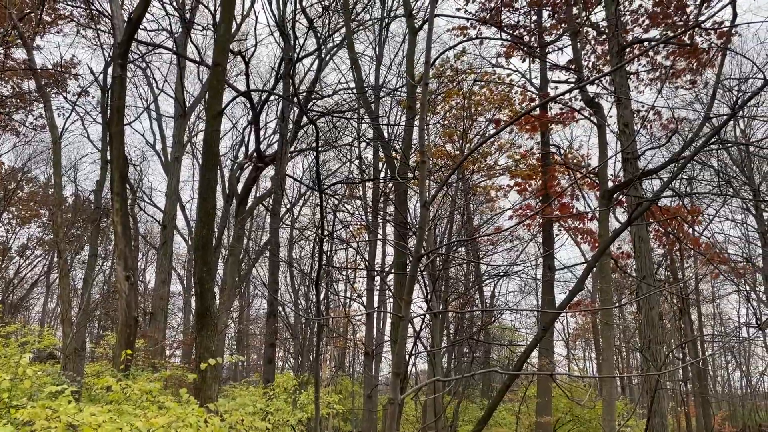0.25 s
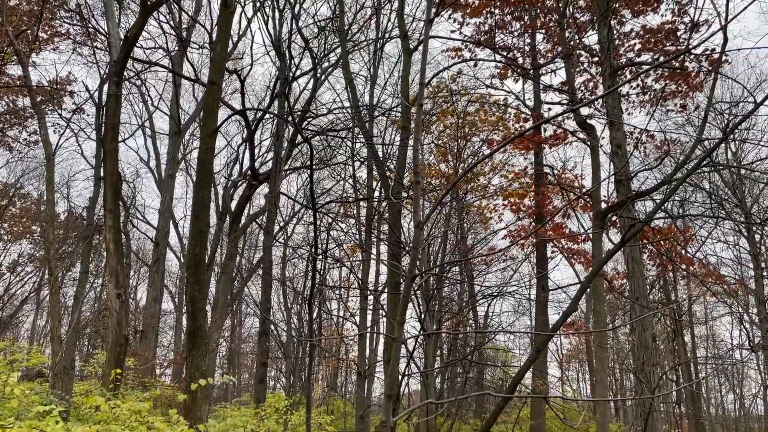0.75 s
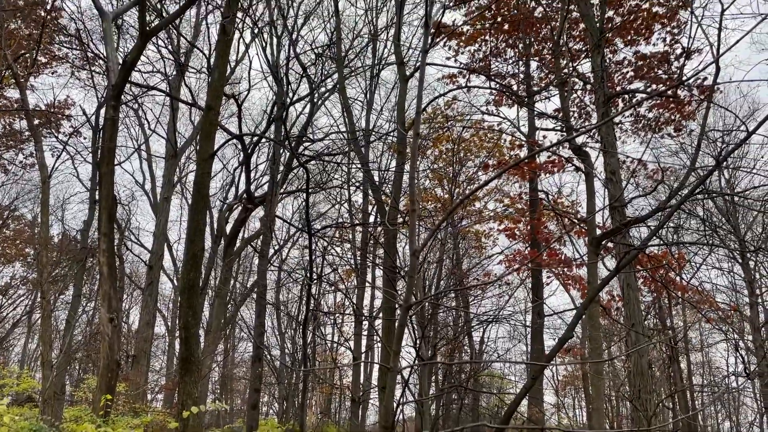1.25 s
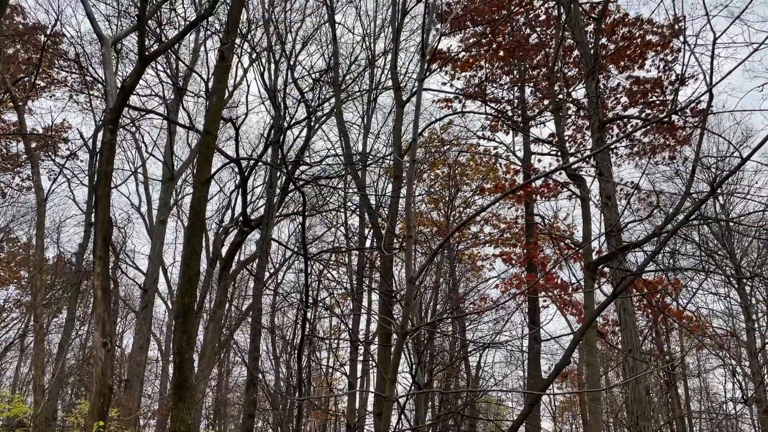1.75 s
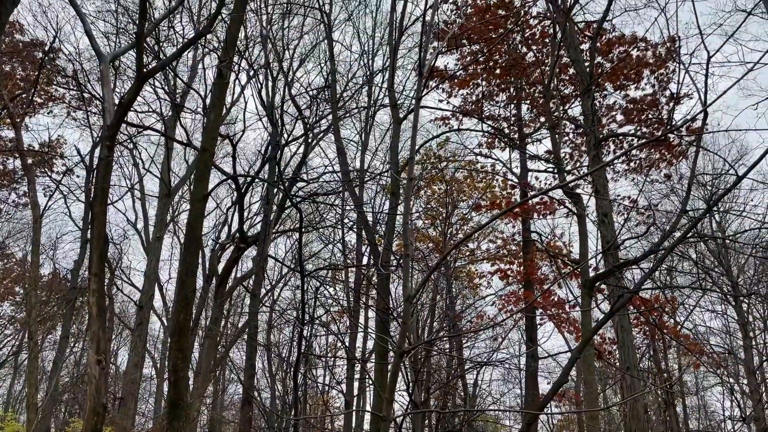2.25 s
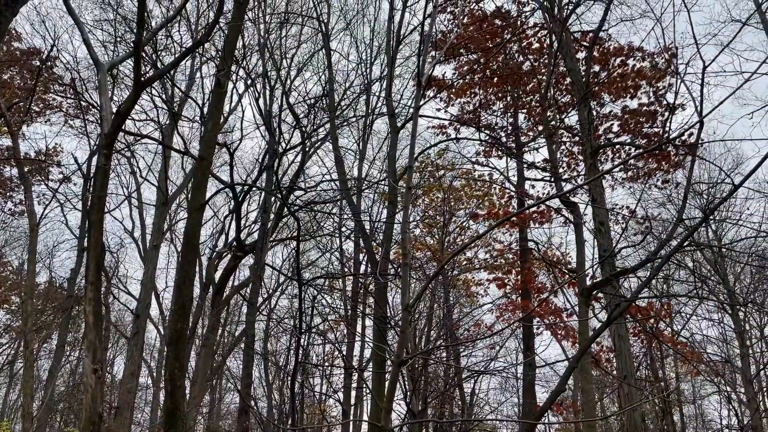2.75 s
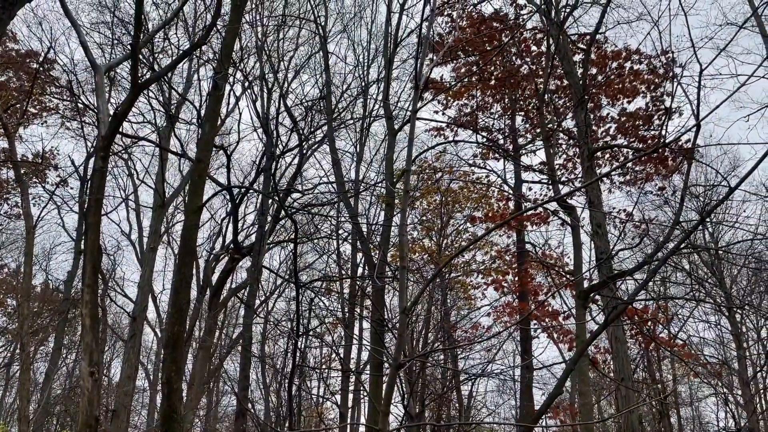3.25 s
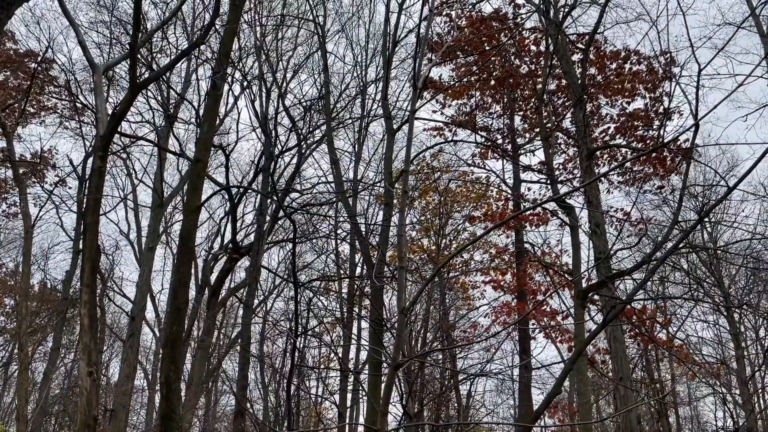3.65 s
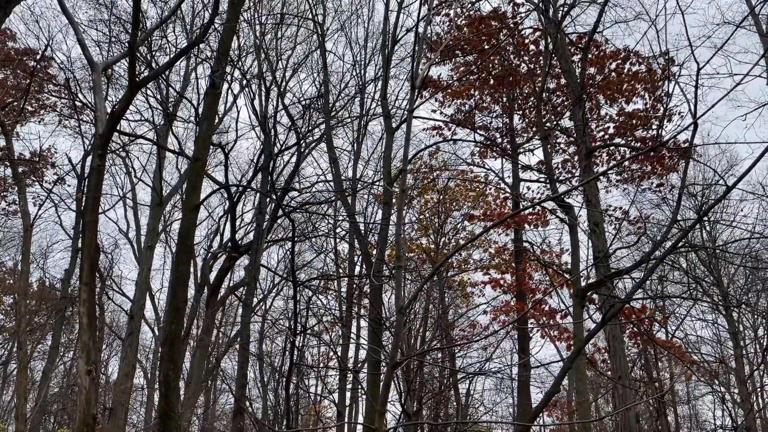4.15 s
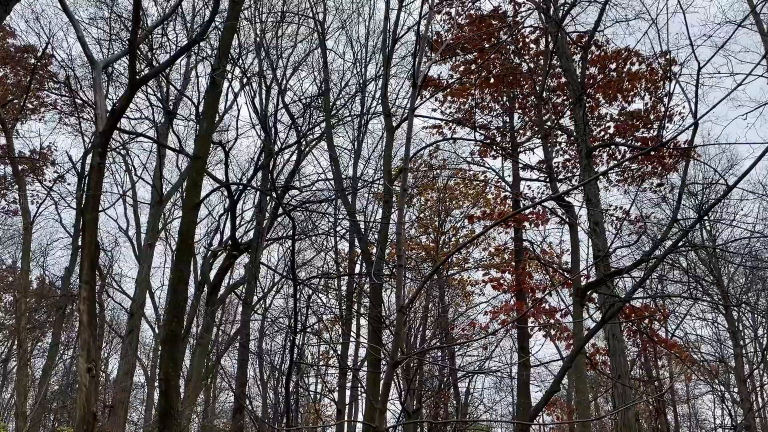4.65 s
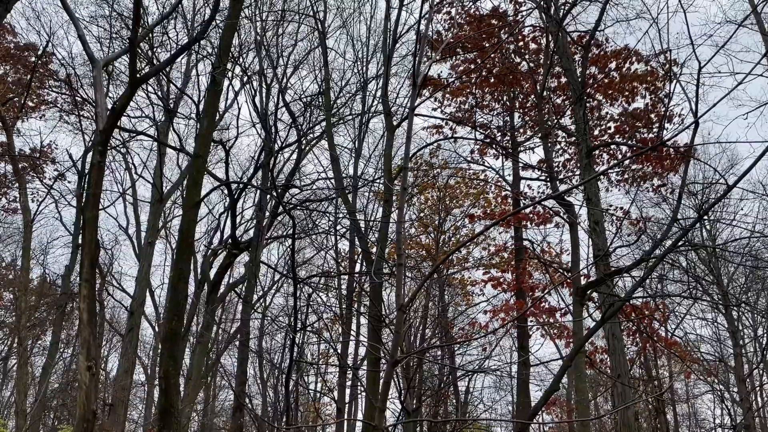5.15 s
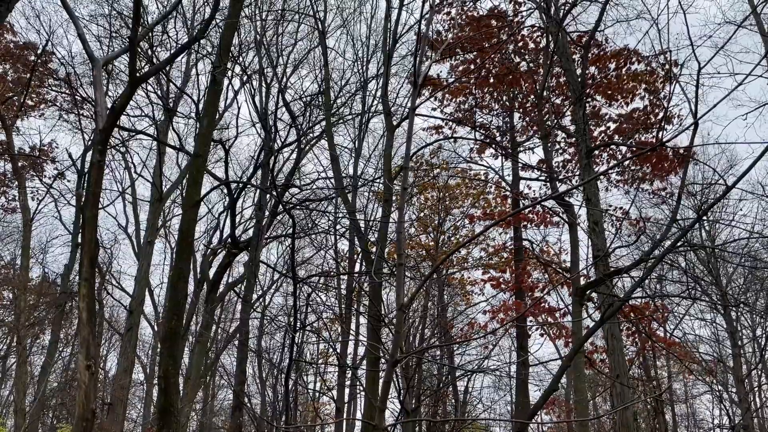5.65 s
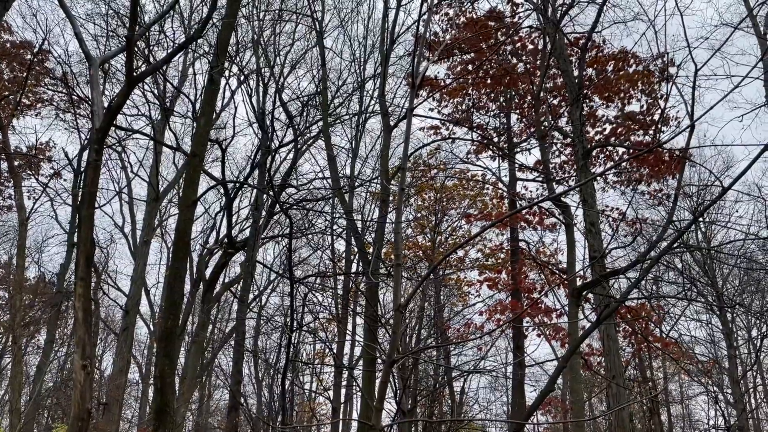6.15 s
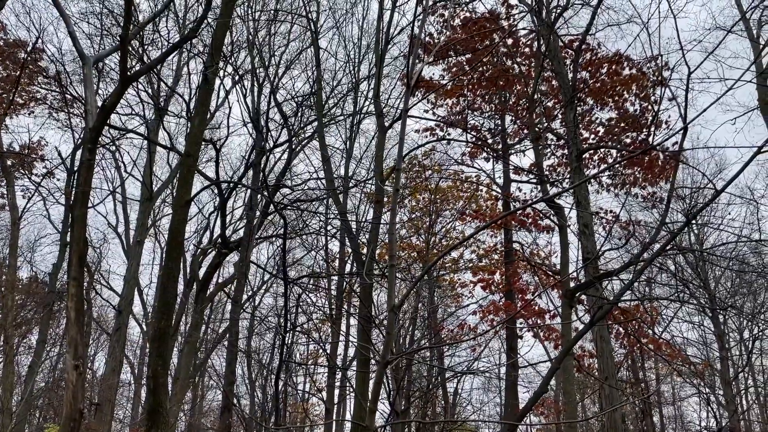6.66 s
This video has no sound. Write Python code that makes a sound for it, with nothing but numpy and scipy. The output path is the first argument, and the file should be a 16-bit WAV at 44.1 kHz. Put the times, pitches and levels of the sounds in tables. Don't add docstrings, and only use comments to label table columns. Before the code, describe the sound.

Outdoors in a bare wood, a flock of small birds calls without pause. Short clear whistles, low warbles and quick upward slurs come from nearby perches, over a dense blurred chorus farther off. Trunks give each note a brief soft tail. A low distant rumble and faint hiss stay beneath, with dull wind bumps on the stereo microphone, strongest late in the stretch.

```python
import sys
import numpy as np
from scipy import signal
from scipy.fft import rfft, irfft
from scipy.io import wavfile
from scipy.ndimage import uniform_filter1d

SR = 44100
rng = np.random.default_rng(int(sys.argv[2]) if len(sys.argv) > 2 else 0)


def output_pcm(signal):
    pcm = np.clip(np.atleast_2d(signal).T, -1, 1) * 32767
    wavfile.write(sys.argv[1], SR, np.round(pcm).astype(np.int16))


def voltage_ratio(level):
    return 10 ** (np.asarray(level, float) / 20)


N = 304290
HZ = np.fft.rfftfreq(N, 1 / SR) + 1e-3


def rms_one(x):
    return x / np.sqrt(np.mean(x ** 2) + 1e-20)


def in_time(rows):
    s, *columns = np.transpose(rows)
    return np.array([voltage_ratio(np.interp(np.arange(N) / SR, s, column)) for column in columns])


def at_hz(points):
    hz, value = np.transpose(points)
    return np.interp(np.log(HZ), np.log(hz), value)


def drift(rate):
    pole = np.exp(-80 * np.pi * rate / SR)
    noise = rng.standard_normal(N // 40 + 2002)
    slow = signal.lfilter([1], [1, -2 * pole, pole * pole], noise)[2000:]
    return np.interp(np.arange(N) / 40, np.arange(len(slow)), rms_one(slow))


def coloured(spectrum):
    return rms_one(irfft(rfft(rng.standard_normal(N)) * voltage_ratio(at_hz(spectrum)), N))


def band_noise(low_hz, high_hz, shape=N):
    band = signal.butter(2, [low_hz, high_hz], "band", fs=SR, output="sos")
    return signal.sosfilt(band, rng.standard_normal(shape))


def high_pass(x, order, hz):
    return signal.sosfilt(signal.butter(order, hz, "high", fs=SR, output="sos"), x)


def at_ports(x, pan_db, lead):
    # frequency in Hz, phase in rad.
    port_lead = [(2000, 1.63), (2840, -0.03), (3960, 0), (5000, 0.9), (6030, -1), (6720, 0.6), (7670, -3.5),
                 (8870, -2), (10400, -19), (13000, -10), (14500, -3)]
    place = 1 / (1 + (HZ / 7000) ** 12)
    half = np.exp(.5j * (at_hz(port_lead) + lead * place))
    left = half * voltage_ratio(pan_db * place / 2)
    right = half.conj() * voltage_ratio(-pan_db * place / 2)
    return irfft(rfft(x) * np.array([left, right]), N)


def air(patchy_db=1.3):
    # frequency in Hz, density in dB per Hz.
    mid_spectrum = [(59, -23), (100, -3.5), (178, -9), (922, -20.5), (1710, -22), (2280, -18.5),
                    (3370, -20), (4050, -23.5), (6920, -29.5), (7510, -36.5), (7990, -56.5), (9420, -38.5),
                    (10900, -35.5), (12600, -44), (13600, -47.5)]
    # frequency in Hz, density in dB per Hz.
    side_spectrum = [(40, -29), (85, -14), (400, -10), (1100, -12.5), (2730, -11), (4030, -16.5),
                     (6100, -23), (8170, -18), (9930, -29.5), (11000, -41), (12600, -50), (13800, -32),
                     (15200, -37), (15800, -48)]
    mid = rfft(voltage_ratio(-51) * coloured(mid_spectrum))
    side = voltage_ratio(-55) * coloured(side_spectrum)
    corners = [0, 8500, 9700, 12500, SR]
    bands = [irfft(mid * (HZ >= low) * (HZ < high), N) for low, high in zip(corners, corners[1:])]
    patches = sum(band * voltage_ratio(patchy_db * drift(5.6)) for band in bands[1:])
    return bands[0] + patches + side * [[1], [-1]]


def wind(lumpy_db=3.0, side_db=-13.3):
    # time in seconds, rumble in dB, deep buffeting in dB.
    gust = [(0.0, -45.5, -73), (0.52, -46.5, -61), (2.71, -49, -70), (3.09, -48.5, -53), (3.62, -50.5, -64),
            (3.73, -44.5, -37.5), (3.84, -52.5, -63), (5.13, -47.5, -55.5), (5.57, -44.5, -51),
            (6.71, -48, -56), (6.9, -51.5, -67)]
    # frequency in Hz, density in dB per Hz.
    rumble_spectrum = [(13, -32), (22, -26), (53, -4), (73, 4.5), (193, -17), (226, -13), (318, -30),
                       (400, -20.5), (520, -50), (880, -120)]
    # time in seconds, peak in dB.
    bumps = [(0.069, -26), (0.12, -26.5), (0.207, -24.5), (0.334, -35), (0.43, -31), (0.487, -32),
             (0.776, -30), (1.531, -28.5), (2.089, -33), (2.329, -29), (2.418, -26.5), (3.192, -30),
             (3.281, -28), (3.738, -26), (4.464, -28), (4.682, -24), (5.208, -32), (5.451, -20.5),
             (5.536, -17.5), (5.652, -32), (5.732, -29), (5.866, -17), (5.968, -21.5), (6.12, -18),
             (6.264, -31), (6.38, -27.5), (6.514, -33), (6.57, -26.5), (6.775, -31)]
    rumble, deep = in_time(gust)
    mid_side = np.array([coloured(rumble_spectrum) * voltage_ratio(lumpy_db * drift(11.8)) * rumble for _ in range(2)])
    mid_side += voltage_ratio(4.5) * deep * rms_one(band_noise(36, 52, (2, N)))
    t = np.arange(round(.12 * SR)) / SR
    for s, peak_db in bumps:
        tune, turn = rng.random(2)
        hz = (55 + 18 * tune) * (1 + 1.44 * np.exp(-t / 0.007))
        cycles = np.cumsum(hz) / SR + turn + [[0], [.25]]
        bump = np.sin(2 * np.pi * cycles) * t / 0.026 * np.exp(1 - t / 0.012)
        at = round((s - .02) * SR)
        mid_side[:, at:at + len(t)] += voltage_ratio(peak_db - 2.5) * bump[:, :N - at]
    return mid_side[0] + voltage_ratio(side_db) * mid_side[1] * [[1], [-1]]


def sing(notes, buzz, waver=0.0069, flutter_db=2.4, scoop=.04):
    out = np.zeros(N)
    pitch_waver = 1 + waver * drift(73)
    flutter = voltage_ratio(flutter_db * drift(120))
    rough = rms_one(band_noise(70, 420))
    for s, ms, start_hz, mid_hz, end_hz, peak_db in notes:
        at = max(round((s - .003) * SR), 0)
        span = np.linspace(0, 1, round((ms + 6) * SR / 1000))[:N - at]
        u = (span * (ms + 6) - 3) / ms
        hz = start_hz * (1 - u) * (1 - 2 * u) + 4 * mid_hz * u * (1 - u) + end_hz * u * (2 * u - 1)
        hz *= 1 - scoop * np.exp(-span * ms / 4.97)
        sine = np.sin(2 * np.pi * np.cumsum(hz * pitch_waver[at:at + len(u)]) / SR)
        octave = 2 * sine ** 2 - 1
        swell = np.sin(np.pi * span) ** 0.71
        out[at:at + len(u)] += voltage_ratio(peak_db) * swell * (sine + voltage_ratio(-27.5) * octave)
    return out * flutter * (1 + buzz * rough)


def notes_at(perch):
    # start in seconds, length in ms, middle pitch in Hz, peak in dB.
    warbles = ([(.181, 63, 2310, -44), (.335, 27.4, 2300, -50), (0.8, 34.3, 3000, -51),
               (.812, 63, 2793, -48.5), (.9, 45, 2280, -44), (.95, 60, 2330, -40), (0.9, 40, 2275, -46),
               (1.14, 55, 2270, -47), (3.155, 48, 2148, -42), (3.733, 48, 2242, -50),
               (4.018, 21, 2640, -36), (4.086, 33.5, 2292, -46.5), (4.5, 113, 2820, -53),
               (4.655, 105, 2370, -47), (4.462, 36, 3100, -53), (1.94, 25, 3100, -50.5),
               (3.27, 16, 3200, -50), (5.18, 16, 3500, -52), (5.3, 26, 3450, -53), (5.355, 100, 3480, -56),
               (5.215, 25.4, 2400, -44), (4.984, 60, 2490, -48.5), (6.37, 26, 2312, -45),
               (6.502, 73, 3030, -52)], [(5.04, 52, 2560, -45.5), (5.183, 51, 2350, -48),
               (6.828, 26, 2560, -44), (6.245, 25, 3250, -50), (.765, 28, 1720, -48)], [])
    whistles = ([(.037, 59, 4180, -46), (.754, 46, 4120, -36.5), (1.25, 65.4, 4180, -47),
                (1.466, 46, 4420, -46), (2.208, 33, 4020, -47), (2.237, 57, 4665, -47.5),
                (2.937, 31, 5080, -55), (3.246, 59, 3880, -40.5), (3.148, 22, 4400, -50.5),
                (3.36, 42, 3850, -50), (3.27, 18, 4320, -50), (.125, 26, 4510, -53), (.195, 55, 4700, -53),
                (2.25, 96, 3970, -56), (2.365, 58, 3960, -51), (4.225, 55, 4800, -56),
                (4.38, 15, 4600, -48.5), (4.408, 47, 3724, -51), (4.57, 45, 4190, -54),
                (4.615, 43, 3960, -54), (4.68, 92, 4800, -56), (4.958, 22, 3890, -50),
                (5.01, 70, 3860, -53), (5.09, 35, 4130, -55), (5.145, 41, 3800, -54), (5.22, 60, 4030, -52),
                (5.32, 84, 4395, -55), (3.768, 63, 3950, -38.5), (4.12, 87, 4150, -53),
                (4.8, 54, 4800, -46), (4.8, 41, 3965, -39), (5.509, 53, 4230, -43.5)],
                [(.335, 37, 4050, -46.5), (.48, 81, 4190, -49.5), (.854, 53, 4420, -50),
                (1.786, 46, 4340, -46), (2.755, 23, 4460, -48.5), (6.285, 45, 4100, -48),
                (6.33, 10, 3630, -47), (6.36, 70, 4170, -43.5), (6.715, 45, 3945, -44)],
                [(.775, 37.5, 4980, -53), (.795, 35, 3800, -45), (.83, 55, 4130, -46),
                (1.76, 46, 3880, -41.5), (2.962, 71, 4110, -44), (2.998, 95, 3990, -57),
                (6.392, 28.5, 4700, -46)])
    more_whistles = ([], [(6.23, 45, 4130, -50), (6.335, 16, 4400, -48), (6.665, 50, 4400, -52),
                     (2.61, 80, 3750, -51), (2.72, 35, 4350, -52), (3.045, 60, 4450, -53), (2.85, 25, 5500, -54),
                     (1.425, 40, 3750, -48)], [])
    seets = ([(.17, 50, 5590, -58), (3.408, 28, 6430, -55), (.341, 53, 5720, -57), (.459, 42, 5360, -54),
             (1.424, 55, 7530, -49), (1.486, 28, 7820, -54), (2.908, 12, 6500, -52), (5.586, 13, 9100, -54),
             (5.827, 34, 7440, -51), (6.362, 39, 6600, -54)], [(.665, 89, 5450, -56.5),
             (.795, 47.5, 6190, -45), (1.598, 65, 6690, -55.5)], [])
    arches = ([(.38, 49, 2235, -48), (1.735, 54, 3210, -52), (4.05, 33, 2760, -40.5),
              (4.135, 50.3, 2610, -43.5)], [(5.099, 38, 2820, -42.5)], [(5.274, 62.4, 3394, -53),
              (5.579, 36.4, 4450, -32), (6.397, 37, 2493, -51)])
    lifts = ([(1.19, 54, 2734, -55), (6.112, 31, 5020, -58), (2.777, 61, 7320, -56.5),
             (5.585, 30.8, 7580, -45), (5.668, 42, 6850, -51)], [(1.599, 43.5, 4080, -50),
             (2.428, 65, 4440, -49.5), (5.013, 37, 4870, -51.5), (5.495, 60, 4950, -55),
             (3.655, 28, 4380, -47), (5.672, 40, 4170, -42), (5.803, 34.2, 4880, -51),
             (5.835, 32.7, 5200, -46), (5.901, 51.3, 4700, -52), (6.35, 30, 4230, -45.5)], [])
    sags = ([(.298, 36, 4180, -50), (1.985, 35, 2300, -53), (4.6, 40, 2480, -48), (4.92, 35, 3350, -50),
            (4.975, 32, 3620, -50), (3.855, 42, 3000, -45), (.85, 17, 2110, -48), (1.378, 46, 3930, -44),
            (2.45, 50, 2865, -46.5), (2.74, 33, 1946, -45), (3.665, 40, 8100, -52), (3.967, 32, 2610, -43),
            (6.765, 25, 2150, -49), (6.638, 24, 4350, -46), (5.995, 28, 3950, -41), (5.806, 16, 7700, -52),
            (5.96, 32, 4080, -50), (6.345, 33, 2725, -60), (6.385, 32, 7550, -53), (6.559, 67, 2855, -47)],
            [(2.79, 51.6, 4190, -56)], [(6.058, 46.6, 4250, -50)])
    drops = ([(.263, 38, 2876, -39.5), (1.81, 45, 3050, -54), (3.445, 22, 3400, -52),
             (3.525, 37, 2830, -42), (3.558, 50, 2170, -47.5), (4.172, 72, 2270, -41),
             (5.325, 25.4, 2894, -51), (5.612, 9, 6500, -43), (6.832, 29, 3710, -44)],
             [(5.619, 10, 4800, -47), (1.465, 12, 2200, -50)], [])
    dives = ([(3.655, 34.6, 2270, -57)], [], [(5.611, 20, 2950, -42.5)])
    slurs = ([(1.359, 14, 5330, -42.5), (4.772, 11.8, 4430, -41), (4.79, 13, 3520, -43.5),
             (5.499, 10, 3570, -45.5)], [(.31, 14, 4700, -50), (2.909, 12, 6200, -59),
             (5.574, 17, 8030, -47), (6.335, 24, 5500, -57), (6.632, 13, 6400, -54),
             (6.819, 16, 5750, -44)], [])
    scoops = ([], [(5.551, 17, 2840, -54), (5.556, 16, 5200, -42), (5.567, 19, 5560, -37.5)],
              [(2.938, 23, 2980, -41), (5.561, 20, 2700, -45)])
    # start in seconds, hold in ms, top pitch in Hz, peak in dB.
    hooks = ([(.02, 12, 6600, -50), (.455, 11, 6360, -53), (.735, 40, 6620, -53), (3.238, 26, 6420, -50.5),
             (3.757, 36, 6660, -48), (4.777, 29, 6700, -49.5), (5.935, 60, 6620, -51)],
             [(2.695, 45, 7000, -57), (2.893, 10, 6550, -54), (2.208, 40, 6500, -56),
             (4.915, 47, 6750, -53.5), (5.488, 39, 6800, -55)], [(.787, 22, 6200, -48),
             (1.739, 47, 6080, -46.5), (2.944, 35, 6360, -48)])
    shapes = [(warbles, 1.003, 0.95), (whistles, 0.99, 0.99), (more_whistles, .99, 0.99), (seets, 0.98, 1),
              (arches, .91, .9), (lifts, .92, 1.035), (sags, 1.05, 0.94), (drops, 1.15, .86),
              (dives, 1.6, 0.672), (slurs, .82, 1.13), (scoops, .71, 1.2)]
    notes = []
    for kind, start, end in shapes:
        notes += [(s, ms, hz * start, hz, hz * end, db) for s, ms, hz, db in kind[perch]]
    rise_ms, bend = 26, 0.98
    for s, ms, hz, db in hooks[perch]:
        notes += [(s, rise_ms, hz * 0.58, hz * .86, hz * bend, db),
                  (s + rise_ms / 1000, ms, hz * bend, hz, hz, db - 5)]
    return notes


def far_birds(spread_db=2.1, detune=.05):
    # time in seconds, low warblers in dB, high callers in dB.
    chorus = [(0.0, -52.5, -55.5), (0.98, -57.5, -58.5), (1.69, -56.5, -55), (2.02, -57, -63),
              (3.07, -55.5, -55), (4.11, -56.5, -59), (4.38, -58, -62), (5.07, -58, -56),
              (5.63, -59.5, -56), (6.9, -53, -56)]
    kinds = np.vstack([notes_at(perch) for perch in range(3)])
    kinds = kinds[np.abs(np.log(kinds[:, 4] / kinds[:, 2])) < .2]
    kinds = kinds[(kinds[:, 3] > 2100) & (kinds[:, 3] < 7000)]
    count = round(320 * N / SR)
    notes = kinds[rng.integers(0, len(kinds), count)]
    notes[:, 0] = rng.random(count) * N / SR
    notes[:, 1] = np.minimum(notes[:, 1], 36)
    notes[:, 2:5] *= np.exp(detune * rng.standard_normal((count, 1)))
    distance_db = -6.7 * np.log2(notes[:, 3] / 3000)
    notes[:, 5] = spread_db * rng.standard_normal(count) + distance_db
    low = notes[:, 3] < 3400
    groups = notes[low], notes[~low]
    return sum(gain * rms_one(sing(group, buzz=0.27)) for gain, group in zip(in_time(chorus), groups))


def squabbles():
    # start in seconds, length in ms, lowest pitch in Hz, highest pitch in Hz, peak in dB.
    outbreaks = [(.32, 85, 1970, 4500, -60), (.77, 126, 1910, 4660, -52), (.88, 160, 2100, 3000, -55),
                 (2.93, 100, 2400, 5500, -50), (3.82, 76, 2210, 4180, -51), (4.769, 104, 2210, 5060, -55.5),
                 (4.999, 350, 1992, 4170, -56), (5.562, 78, 1492, 3500, -55), (5.85, 118, 1506, 2985, -54),
                 (6.27, 182, 1594, 4710, -50.5)]
    notes = []
    for s, ms, low_hz, high_hz, peak_db in outbreaks:
        count = round(160 * ms / 1000)
        when, pitch, length, slide, soft = rng.random((count, 5)).T
        hz = low_hz * (high_hz / low_hz) ** pitch
        bend = 0.263 * (slide - .5)
        notes += zip(s + when * ms / 1000, 12 + 35 * length,
                     hz * (1 - bend), hz, hz * (1 + 0.36 * bend), peak_db - 7.2 * soft)
    return sing(notes, buzz=.6)


def near_birds():
    # left-right level in dB, extra left lead in rad.
    perches = [
        (1.3, 0.23),
        (7.5, 0.48),
        (10.5, 3.2),
    ]
    voices = [sing(notes_at(perch), buzz=.3) for perch in range(3)]
    voices[0] = voices[0] + squabbles()
    direct = sum(at_ports(voice, pan_db, lead) for voice, (pan_db, lead) in zip(voices, perches))
    together = sum(voices)
    effort = uniform_filter1d(np.abs(together), size=600)
    husk = voltage_ratio(-18) * effort * band_noise(9600, 13000)
    sum_tones = voltage_ratio(21.5) * high_pass(together ** 2, 8, 9500)
    return direct + at_ports(husk + sum_tones, 0, 0), together


def wood(x, shared=0.23):
    t60_s = 0.42
    t = np.arange(round(.6 * SR)) / SR
    decay = voltage_ratio(-60 * t / t60_s) * np.minimum(t / .02, 1)
    echoes = rng.standard_normal((3, len(t))) * decay
    echoes /= np.linalg.norm(echoes[0])
    ahead, left, right = signal.fftconvolve(x[None], echoes, axes=1)[:, :N]
    around = signal.sosfilt(signal.butter(4, 6500, fs=SR, output="sos"), [left, right])
    return np.sqrt(shared) * at_ports(ahead, 2.6, 0) + np.sqrt(1 - shared) * around


def scene():
    direct, near = near_birds()
    far = far_birds()
    echoes = wood(voltage_ratio(-5.5) * near + voltage_ratio(-5.5) * far)
    return direct + at_ports(voltage_ratio(-2.0) * far, 7.7, 0) + echoes + wind() + air()


def band_limit(x):
    return signal.sosfilt(signal.butter(12, 15750, fs=SR, output="sos"), x)


def record(dry):
    mid = rfft(dry[0] + dry[1]) * (HZ < 13750)
    side = rfft(dry[0] - dry[1])
    mix = irfft([mid + side, mid - side], N) / 2
    return band_limit(high_pass(mix, 2, 30))


dry = scene()
out = record(dry)
output_pcm(out)
```